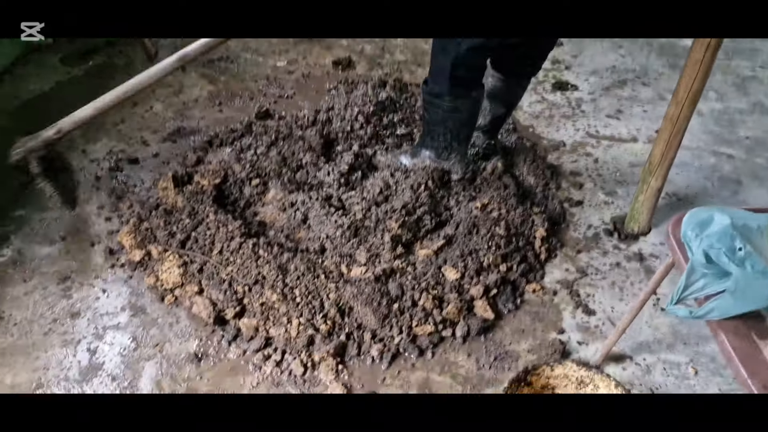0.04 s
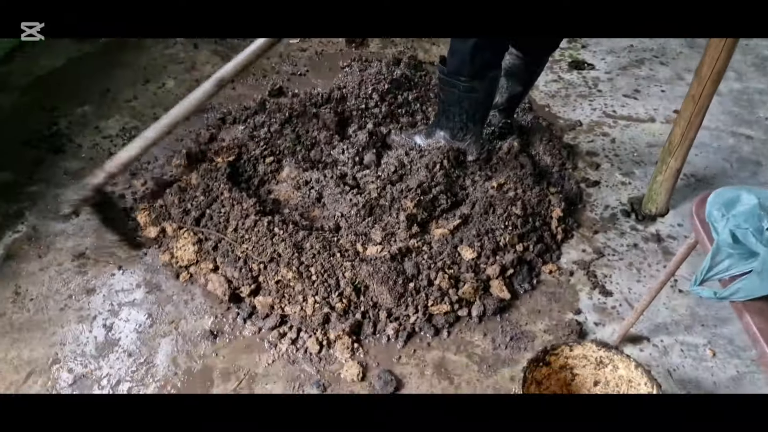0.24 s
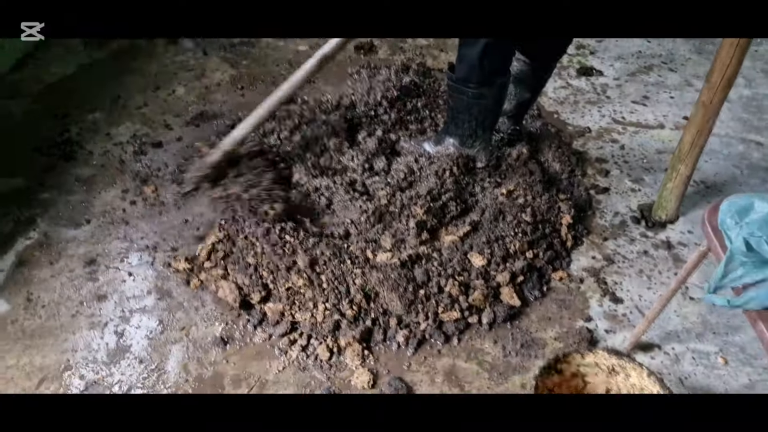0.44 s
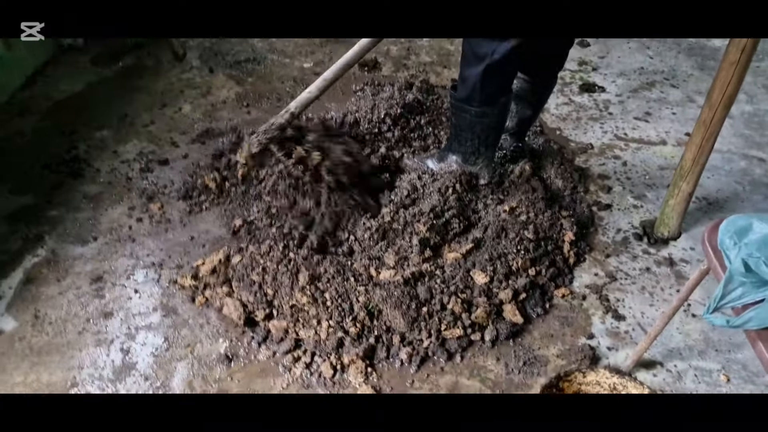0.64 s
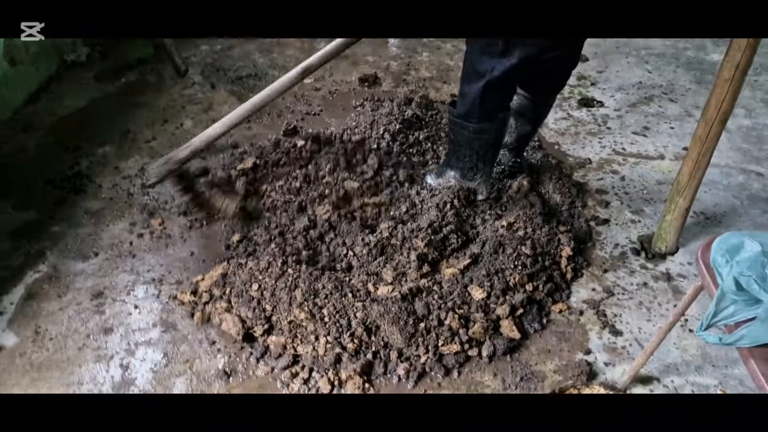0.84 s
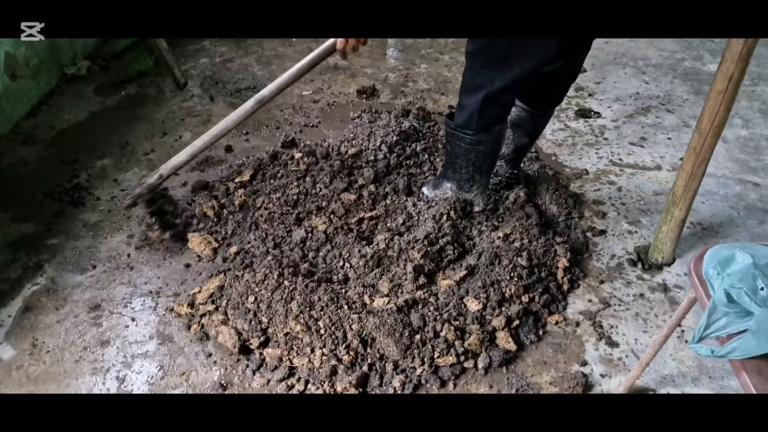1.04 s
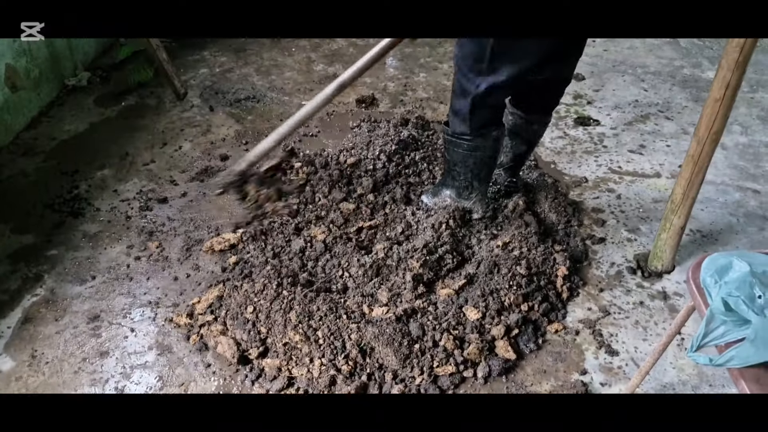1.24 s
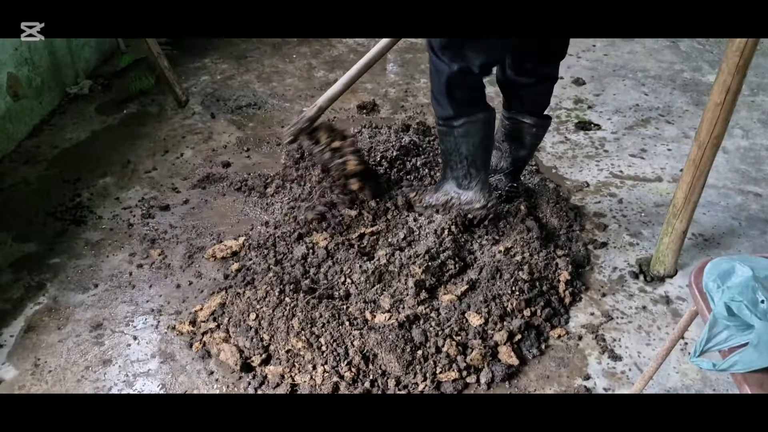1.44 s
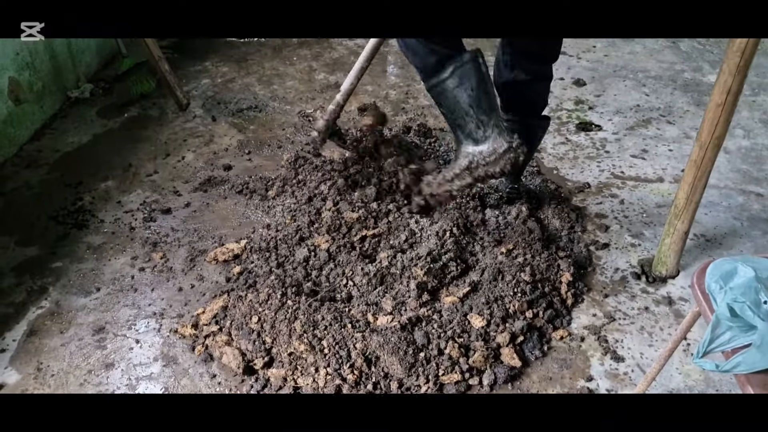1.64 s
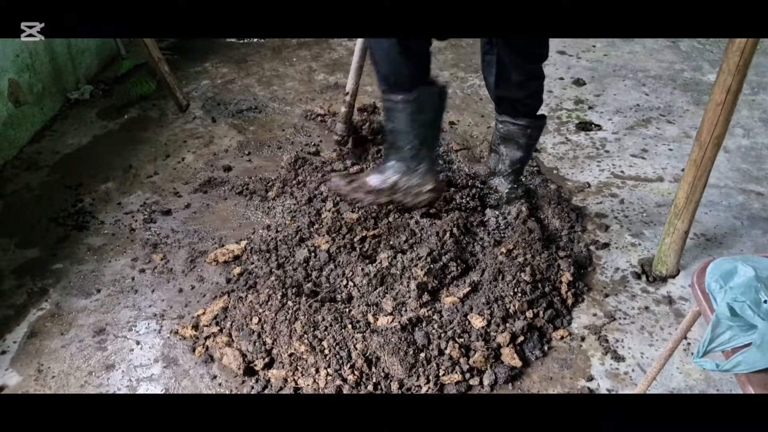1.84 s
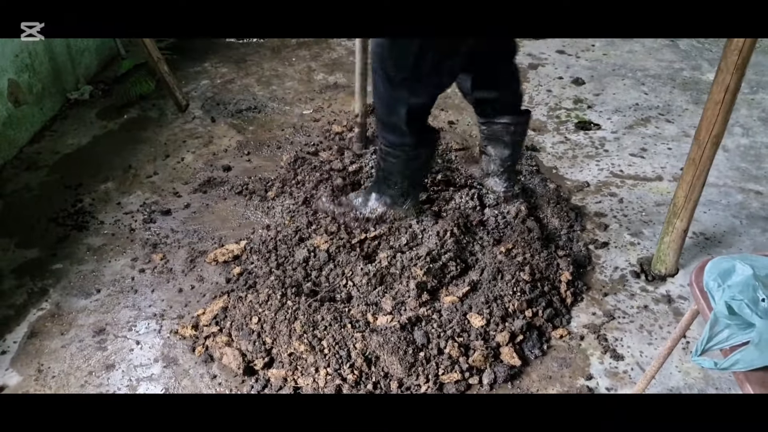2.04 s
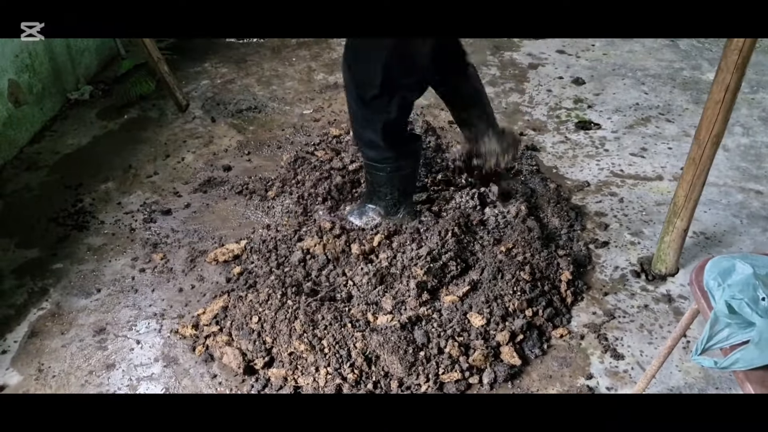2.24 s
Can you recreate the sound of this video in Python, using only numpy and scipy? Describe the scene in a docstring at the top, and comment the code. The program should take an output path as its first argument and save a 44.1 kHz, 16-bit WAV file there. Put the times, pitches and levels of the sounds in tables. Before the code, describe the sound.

Hoe blade strikes and drags gritty earth in a hard-walled yard, followed by quieter crunching boot steps.

```python
"""A hoe chops twice into a heap of damp clay: bursts of clicks, dull thuds, and ringing blade and handle.
Its blade drags gritty earth over concrete, made of random clicks, and sings faintly as it slides off.
Rubber boots then tread into the heap: filtered clicks crumble, and humming bands of noise are the boot
shafts flexing. Crumbs drop and the heap rumbles. Hard walls answer all of these with fading noise,
and faint outdoor air, a steady noise, lies behind."""
import sys
import numpy as np
from scipy import signal
from scipy.fft import rfft, irfft, next_fast_len
from scipy.io import wavfile
from scipy.ndimage import uniform_filter1d

SR = 44100
rng = np.random.default_rng(int(sys.argv[2]) if len(sys.argv) > 2 else 0)


def materialize(psi):
    """Save the field psi as 16-bit PCM at rate SR to the path in sys.argv[1].

    A 1-D psi becomes a single channel; in a 2-D psi each row is a channel.
    """
    bounded = np.clip(np.atleast_2d(psi).T, -1, 1)
    quanta = np.round(bounded * 32767).astype(np.int16)
    wavfile.write(sys.argv[1], SR, quanta)


N = 101429
TIME = np.arange(N) / SR  # seconds

# All levels are those of a source before it is placed in the yard.
# Rise and hold are lengths; release is the time to fade to about a third. t60 is the time to fade by 60 dB.

# the hoe lands, then jolts against clods: [t/s, crack level/dB, ring level/dB, blade pitch ratio, thud level/dB]
HOE_CONTACTS = [(0.2182, -11.5, -12, 0.97, -26), (0.2212, -22, -11, 0.99, -31),
                (0.2365, -37, -18, 0.96, -48.5), (0.2515, -29, -20.5, 1.01, -41),
                (0.2878, -19, -20.5, 1.0, -39), (1.0333, -27.5, -32.5, 1.16, -28.5),
                (1.0575, -23, -28.5, 0.94, -39.5)]
# ways the clay-damped blade rings, before the pitch ratio: [f/Hz, level/dB, t60/s]
BLADE_MODES = [(466, -28, 0.05), (601, -11, 0.091), (713.3, 0, 0.077), (773.5, -2, 0.12),
               (823.7, -1.5, 0.12), (960, -17, 0.022), (1136, -13, 0.046), (1408, -1.5, 0.024),
               (2300, -15, 0.02), (3070, -12, 0.016), (4785, -5.5, 0.026), (4950, -4, 0.0069),
               (7700, -24, 0.0098)]
# a blow sets the wooden handle ringing: [t/s, level/dB, f/Hz]
HANDLE_RINGS = [(0.2205, -21, 815), (1.035, -26, 825)]
# the blade grinds through earth on concrete: [t/s, rise/s, hold/s, release/s, level/dB]
DRAG_STROKES = [(0.23, 0.0024, 0.043, 0.1, -20.5), (0.278, 0.029, 0.057, 0.013, -25),
                (1.053, 0.0025, 0.006, 0.01, -23.5), (1.12, 0.01, 0.023, 0.078, -26)]
# the blade slides lightly off the heap: [t/s, rise/s, hold/s, release/s, level/dB]
SLIDE_STROKES = [(0.799, 0.019, 0.088, 0.056, -46)]
# resonances of the blade clear of the clay: [f/Hz, width/Hz, level/dB]
FREE_BLADE_MODES = [(600, 220, -8), (1000, 420, -3), (1480, 47, -5.5), (2274, 160, -3), (2650, 580, -4.5),
                    (3175, 58, -5), (3250, 590, -4), (3760, 180, -13), (4760, 470, -6)]
# the blade sings thinly as it grazes the floor: [t/s, rise/s, hold/s, release/s, level/dB]
SQUEAK_STROKES = [(1.602, 0.01, 0.024, 0.015, -57.5), (1.652, 0.012, 0.022, 0.012, -62.5),
                  (1.72, 0.03, 0.065, 0.02, -67.5)]
# clay is crushed under a boot: [t/s, rise/s, hold/s, release/s, level/dB, lowest f/Hz, highest f/Hz]
BOOT_STEPS = [(1.3845, 0.001, 0.0028, 0.0055, -40, 1000, 2190),
              (1.39, 0.0032, 0.03, 0.027, -37.5, 520, 2110), (1.504, 0.0048, 0.011, 0.067, -51, 504, 1950),
              (1.864, 0.0066, 0.021, 0.038, -56, 700, 3970), (1.935, 0.065, 0.096, 0.032, -50.5, 150, 2630),
              (2.07, 0.00087, 0.0038, 0.011, -30.5, 775, 2550),
              (2.077, 0.0076, 0.019, 0.022, -34, 129, 4000),
              (2.175, 0.001, 0.0035, 0.0052, -37.5, 910, 3460),
              (2.182, 0.0073, 0.013, 0.056, -45, 188, 2410), (2.201, 0.001, 0.0025, 0.0027, -40, 890, 2900),
              (2.224, 0.001, 0.0033, 0.0045, -38, 900, 2350)]
# hollow knock of a boot coming down: [t/s, rise/s, hold/s, release/s, level/dB, f/Hz]
BOOT_KNOCKS = [(1.402, 0.0054, 0.038, 0.012, -42, 776), (2.082, 0.01, 0.038, 0.014, -47.5, 290)]
# a rubber shaft flexes and its air hums: [t/s, rise/s, hold/s, release/s, level/dB, f/Hz]
SHAFT_FLEXES = [(0.11, 0.022, 0.048, 0.028, -58.5, 300), (0.739, 0.01, 0.03, 0.013, -49.5, 256),
                (0.791, 0.0056, 0.16, 0.03, -43.5, 274.4), (1.419, 0.012, 0.087, 0.023, -51, 280),
                (1.919, 0.009, 0.057, 0.0052, -44, 245)]
# crumbs drop: [t/s, level/dB]
CRUMB_DROPS = [(0.11, -57), (0.609, -54), (0.724, -52), (0.916, -35.5), (1.395, -40), (1.634, -42),
               (1.868, -48), (1.95, -50), (2.2, -43), (2.222, -44), (2.272, -36)]
# the heap shifts under hoe or boot: [t/s, rise/s, hold/s, release/s, level/dB]
HEAP_SHIFTS = [(0.235, 0.026, 0.059, 0.066, -39), (0.46, 0.0099, .02, 0.027, -46),
               (0.883, 0.037, 0.13, 0.067, -55.5), (1.035, 0.023, 0.089, 0.049, -48.5),
               (2.113, 0.012, 0.016, .02, -56.5)]
# tone colours, the balance of low and high in each noise: [f/Hz, relative level/dB]
CRACK_COLOUR = [(200, -35), (700, 9), (2000, 3.5), (3000, -3), (5000, 5), (6200, -2.5), (8300, 4),
                (10500, -9.5), (16000, -17)]
THUD_COLOUR = [(40, 0), (70, -21), (110, -4), (155, 2), (250, -2.5), (330, -5.5), (500, -2.5), (900, 0),
               (3000, -18.5)]
GRIT_COLOUR = [(100, -31), (300, -4.5), (700, 4.5), (1600, 4.5), (3200, -3), (4600, 0.5), (6000, -5),
               (8500, -5), (10500, -12), (13000, -12), (16000, -13.5)]
CLAY_COLOUR = [(60, -9), (150, -5.5), (300, -6), (480, -2.5), (700, 0), (1050, -2.5), (1450, 1.5),
               (2200, -3.5), (4000, -2.5), (6000, -7), (8500, -2), (11000, -11), (16000, -13)]
CRUMB_COLOUR = [(150, -25), (2000, -12), (4500, -3), (8000, 0), (16000, 0)]
HEAP_COLOUR = [(20, -29), (40, -14), (55, 1), (80, -8.5), (115, -22.5), (300, -39)]
AIR_COLOUR = [(20, -10), (60, -5.5), (150, -6.5), (300, 2.5), (600, 1.5), (1200, -2), (3000, -8.5),
              (4700, -8.5), (7000, -13.5), (16000, -17)]
# how long the yard's echoes last: [f/Hz, t60/s]
YARD_T60 = [(60, 0.85), (250, 0.63), (700, 0.47), (2000, 0.54), (5000, 0.38), (9000, 0.27), (16000, 0.2)]
# how alike left and right are in sound from all sides: [f/Hz, likeness from -1 to 1]
LIKENESS = [(60, 0.87), (130, 0.93), (290, 0.86), (640, 0.38), (1400, -0.19), (3000, 0.055), (8000, 0.026)]

CRACK_S, THUD_S = 0.0024, 0.023  # each is both a hold and a release
BITE_S = 0.00202  # rise of the thud, and longest delay of the blade's low modes
HANDLE_T60_S = 0.15
DRAG_GRAINS_PER_S, DRAG_ROUGH_DB, DRAG_RING_DB = 750, 4, -15.5
STONES_PER_S, STONE_ROUGH_DB, STONE_DB = 110, 2, -9
SLIDE_GRIT_DB = -12
SQUEAK_HZ, SQUEAK_WAVER_HZ = 3120, 10.9  # centre and typical wander of the pitch
STEP_GRAINS_PER_S, STEP_ROUGH_DB = 900, 3
STEP_GRIT_DB = -13  # fine grit heard over the whole range
KNOCK_T60_S = 0.032
SHAFT_WIDTH_HZ = 74  # width of the shaft's hum; the foot's is narrower by TOE_RATIO
TOE_RATIO, TOE_DB = 0.513, -12.5  # the foot of the boot hums lower and softer
CRUMB_S, CRUMB_ROUGH_DB = 0.0065, 3
AIR_DB = -52

# placing: extra delay at the right, left-right tilt each way, direct level, walls' level
HOE_LAG_S, HOE_PAN_DB, HOE_DIRECT_DB, HOE_YARD_DB = .00035, 2, -8, -1.5
CHOP_DIRECT_DB, CHOP_YARD_DB = -2, 0
STONE_YARD_DB, SQUEAK_YARD_DB = -6, -7
BOOT_LAG_S, BOOT_PAN_DB, BOOT_DIRECT_DB, BOOT_YARD_DB = -.00007, 1.6, 0.5, 5
FLEX_DIRECT_DB, FLEX_YARD_DB = -4.5, -10.5
HEAP_DIRECT_DB, HEAP_YARD_DB = 2, -8
WALL_DELAY_S, WALL_BUILD_S = 0.0022, 0.0052
YARD_TREBLE_PAN_DB = -1.3  # minus tilts the echoes' treble to the right

MIC_LOW_CUT_HZ, CUTOFF_HZ = 46, 15900
# the gain drops by AGC_SLOPE dB per dB held above the threshold; the held dB fall at the recovery speed
AGC_THRESHOLD_DB, AGC_SLOPE, AGC_RECOVERY_DB_PER_S = -27, 0.33, 8.5


def from_db(db):
    """Turn decibels into a gain."""
    return 10 ** (np.asarray(db) / 20)


def at_hz(points, hz):
    """Read a table between its points, with pitch spaced as we hear it (logarithmically)."""
    f, value = np.transpose(points)
    return np.interp(np.log(np.maximum(hz, 1)), np.log(f), value)


def colour(x, spectrum):
    """Filter to the given tone colour with no sound ahead of its cause; white noise keeps its level."""
    size = 2 * next_fast_len(N)
    gain = from_db(at_hz(spectrum, np.fft.rfftfreq(size, 1 / SR)))
    level_gain = gain / np.sqrt(np.mean(gain ** 2))
    # fold the log spectrum's backward half onto its forward half
    cepstrum = irfft(np.log(level_gain))
    cepstrum[1:size // 2] *= 2
    cepstrum[size // 2 + 1:] = 0
    response = np.exp(rfft(cepstrum))
    return irfft(rfft(x, size) * response)[..., :N]


def envelope(start, rise, hold, release, db):
    """Loudness shape: a straight rise, a hold, then an exponential fade."""
    age = TIME - start
    rising = np.clip(age / max(rise, 1 / SR), 0, 1)
    fading = np.exp(-np.maximum(age - rise - hold, 0) / max(release, 1 / SR))
    return from_db(db) * rising * fading


def grains(per_s, rough_db):
    """Grit as random clicks of uneven size, scaled to an average (rms) level of 1."""
    sizes = from_db(rough_db * np.minimum(rng.exponential(1, N), 4))
    happens = rng.random(N) < per_s / SR
    clicks = sizes * rng.choice([-1, 1], N) * happens
    return clicks / np.sqrt(np.mean(clicks ** 2) + 1e-20)


def ring(x, hz, t60):
    """A resonance: a click of height 1 sets off a fading sine that starts at height 1."""
    r = from_db(-60 / (t60 * SR))  # loss per sample
    w = 2 * np.pi * hz / SR
    return signal.lfilter([0, np.sin(w)], [1, -2 * r * np.cos(w), r * r], x + 1e-18)


def band_pass(x, low_hz, high_hz):
    """Keep the range between two pitches."""
    return signal.sosfilt(signal.butter(2, [low_hz, high_hz], "band", fs=SR, output="sos"), x)


def as_loud(x, model):
    """Scale x to the power of the model."""
    return x * np.std(model) / np.std(x)


def strokes(table):
    """Add up the loudness shapes of all rows."""
    return sum(envelope(*row) for row in table)


def blade(force, pitch):
    """A struck or rubbed blade rings in many modes at once; the low ones answer a little later."""
    out = 0
    for hz, db, t60 in BLADE_MODES:
        lag = int(BITE_S * SR * min(1, BLADE_MODES[2][0] / hz))
        out = out + from_db(db) * ring(np.roll(force, lag), hz * pitch, t60)
    return out


def chops():
    """Each contact cracks grit, rings the blade and thuds into the clay."""
    crack, thud, rings = 0, 0, 0
    for s, crack_db, ring_db, pitch, thud_db in HOE_CONTACTS:
        crack = crack + envelope(s, 0, CRACK_S, CRACK_S, crack_db)
        thud = thud + envelope(s, BITE_S, THUD_S, THUD_S, thud_db)
        click = signal.unit_impulse(N, int(s * SR))
        rings = rings + from_db(ring_db) * blade(click, pitch)
    cracking = colour(crack * grains(per_s=7000, rough_db=2.0), CRACK_COLOUR)
    thudding = colour(thud * rng.standard_normal(N), THUD_COLOUR)
    return cracking + thudding + rings


def handle():
    """The wooden handle bends to and fro after a blow and gives a short woody knock."""
    out = 0
    for s, db, hz in HANDLE_RINGS:
        click = signal.unit_impulse(N, int(s * SR))
        out = out + from_db(db) * ring(click, hz, HANDLE_T60_S)
    return out


def drags():
    """Grit breaks under the moving blade and keeps it ringing."""
    force = strokes(DRAG_STROKES) * grains(DRAG_GRAINS_PER_S, DRAG_ROUGH_DB)
    ringing = as_loud(blade(force, pitch=1.05), force)
    return colour(force, GRIT_COLOUR) + from_db(DRAG_RING_DB) * ringing


def stones():
    """Sparser clicks: the dragging blade snaps small stones or dry lumps."""
    snaps = strokes(DRAG_STROKES) * grains(STONES_PER_S, STONE_ROUGH_DB)
    return from_db(STONE_DB) * colour(snaps, GRIT_COLOUR)


def slides():
    """Light friction, as noise, keeps the free blade's resonances sounding over a little grit."""
    stroke = strokes(SLIDE_STROKES)
    grit = colour(stroke * grains(DRAG_GRAINS_PER_S, DRAG_ROUGH_DB), GRIT_COLOUR)
    out = from_db(SLIDE_GRIT_DB) * grit
    for hz, width_hz, db in FREE_BLADE_MODES:
        tone = band_pass(rng.standard_normal(N), hz - width_hz / 2, hz + width_hz / 2)
        out = out + from_db(db) * as_loud(stroke * tone, stroke)
    return out


def squeaks():
    """Stick and slip lock on to one resonance of the blade: a sine whose pitch wavers a little."""
    waver = uniform_filter1d(rng.standard_normal(N), size=600)
    hz = SQUEAK_HZ + SQUEAK_WAVER_HZ * waver / np.std(waver)
    return strokes(SQUEAK_STROKES) * np.sin(2 * np.pi * np.cumsum(hz) / SR)


def steps():
    """Lumps crumble under the sole, each tread in its own range, and the boot gives a hollow knock."""
    force, knock = 0, 0
    for *shape, low_hz, high_hz in BOOT_STEPS:
        lumps = envelope(*shape) * grains(STEP_GRAINS_PER_S, STEP_ROUGH_DB)
        grit = envelope(*shape) * grains(STEP_GRAINS_PER_S, STEP_ROUGH_DB)
        crumbling = as_loud(band_pass(lumps, low_hz, high_hz), lumps)
        force = force + crumbling / 2 + from_db(STEP_GRIT_DB) * grit
    for *shape, hz in BOOT_KNOCKS:
        push = envelope(*shape) * rng.standard_normal(N)
        hollow = ring(np.diff(push, prepend=0), hz, KNOCK_T60_S)
        knock = knock + as_loud(hollow, push)
    return colour(force, CLAY_COLOUR) + knock


def flexes():
    """Rubber buckles in an even run of soft slips that sound the air in the shaft and the foot."""
    out = 0
    for *shape, hz in SHAFT_FLEXES:
        for ratio, db in (1, 0), (TOE_RATIO, TOE_DB):
            low_hz = ratio * (hz - SHAFT_WIDTH_HZ / 2)
            high_hz = ratio * (hz + SHAFT_WIDTH_HZ / 2)
            hum = band_pass(grains(per_s=900, rough_db=1), low_hz, high_hz)
            # divide by the running level so that the hum stays even
            evened = hum / np.sqrt(np.abs(uniform_filter1d(hum ** 2, size=900)) + 1e-9)
            out = out + from_db(db) * envelope(*shape) * evened
    return out


def crumbs():
    """Small bits of earth break on the concrete in short, bright bursts of clicks."""
    bursts = sum(envelope(s, 0, 0, CRUMB_S, db) for s, db in CRUMB_DROPS)
    return colour(bursts * grains(per_s=1200, rough_db=CRUMB_ROUGH_DB), CRUMB_COLOUR)


def heap():
    """The shifting mass of earth rumbles: bursts of low noise."""
    return colour(strokes(HEAP_SHIFTS) * rng.standard_normal(N), HEAP_COLOUR)


def diffuse_noise(size):
    """Spectrum of white noise reaching two microphones from all sides, and its frequencies."""
    hz = np.fft.rfftfreq(size, 1 / SR)
    mid, side = rfft(rng.standard_normal((2, size)))
    alike = np.clip(at_hz(LIKENESS, hz), -1, 1)
    shared = np.sqrt((1 + alike) / 2) * mid
    opposed = np.sqrt((1 - alike) / 2) * side * [[1], [-1]]
    return shared + opposed, hz


def yard():
    """Answer of the walls to one click: dense echoes that die band by band over a second."""
    noise, hz = diffuse_noise(SR)
    age, out = TIME[:SR], 0
    build = np.clip((age - WALL_DELAY_S) / WALL_BUILD_S, 0, 1)
    edges = np.r_[0, np.geomspace(90, SR / 2, 16)]
    for low, high in zip(edges, edges[1:]):
        band = irfft(noise * ((hz >= low) & (hz < high)), SR)
        band = band * from_db(-60 * age / at_hz(YARD_T60, (low + high) / 2)) * build
        pan = from_db(YARD_TREBLE_PAN_DB * (low > 5000) * np.array([[1], [-1]]))
        # each band gets energy in step with its width
        out = out + pan * band * np.sqrt(4 * (high - low) / SR / np.sum(band ** 2))
    return out


def place(x, walls, lag_s, pan_db, direct_db, yard_db):
    """Direct sound, later at the right microphone by the lag, plus the walls' answer."""
    left = x * from_db(pan_db)
    right = np.roll(x, int(round(lag_s * SR))) * from_db(-pan_db)
    echoes = signal.fftconvolve(x[None], walls, axes=1)[:, :N]
    return from_db(direct_db) * np.array([left, right]) + from_db(yard_db) * echoes


def spread(source, spots, *position):
    """Earth breaks at several spots at once, and the walls answer each spot differently."""
    return sum(place(source(), walls, *position) for walls in spots) / np.sqrt(len(spots))


def outdoor_air():
    """Faint air from all sides: steady coloured noise."""
    noise, _ = diffuse_noise(2 * next_fast_len(N))
    return from_db(AIR_DB) * colour(irfft(noise)[:, :N], AIR_COLOUR)


def gain_control(x):
    """The recorder turns itself down a little after loud sounds and recovers slowly."""
    smooth = signal.butter(1, 8, fs=SR)
    power = signal.lfilter(*smooth, np.mean(x ** 2, axis=0))
    level_db = 10 * np.log10(power + 1e-12)
    excess_db = np.maximum(level_db - AGC_THRESHOLD_DB, 0)
    # hold the highest excess so far while it falls at a steady speed
    recovery = AGC_RECOVERY_DB_PER_S * TIME
    held_db = np.maximum.accumulate(excess_db + recovery) - recovery
    return x * from_db(-AGC_SLOPE * signal.lfilter(*smooth, held_db))


def scene():
    """Hoe to the left, boots slightly left, rumble central in its direct sound, air all round."""
    spots = [yard() for _ in range(3)]
    at_hoe = HOE_LAG_S, HOE_PAN_DB, HOE_DIRECT_DB, HOE_YARD_DB
    at_boots = BOOT_LAG_S, BOOT_PAN_DB, BOOT_DIRECT_DB, BOOT_YARD_DB
    hoe_side = HOE_LAG_S, HOE_PAN_DB
    boot_side = BOOT_LAG_S, BOOT_PAN_DB
    blows = place(chops() + handle(), yard(), *hoe_side, CHOP_DIRECT_DB, CHOP_YARD_DB)
    grit = spread(drags, spots, *at_hoe) + place(crumbs(), spots[1], *at_hoe)
    grit = grit + place(stones(), spots[2], *hoe_side, 0, STONE_YARD_DB)
    sliding = spread(slides, spots, *at_hoe)
    sliding = sliding + place(squeaks(), spots[0], *hoe_side, 0, SQUEAK_YARD_DB)
    boots = spread(steps, spots, *at_boots)
    boots = boots + place(flexes(), spots[0], *boot_side, FLEX_DIRECT_DB, FLEX_YARD_DB)
    rumble = place(heap(), spots[2], 0, 0, HEAP_DIRECT_DB, HEAP_YARD_DB)
    return blows + grit + sliding + boots + rumble + outdoor_air()


def record(dry):
    """The deepest bass is lost, the gain rides, peaks are rounded, the top is cut."""
    low_cut = signal.butter(6, MIC_LOW_CUT_HZ, "high", fs=SR, output="sos")
    top_cut = signal.ellip(12, .1, 80, CUTOFF_HZ, fs=SR, output="sos")
    heard = signal.sosfilt(low_cut, dry)
    rounded = np.tanh(gain_control(heard))
    return signal.sosfilt(top_cut, rounded)


dry = scene()
out = record(dry)
materialize(out)
```